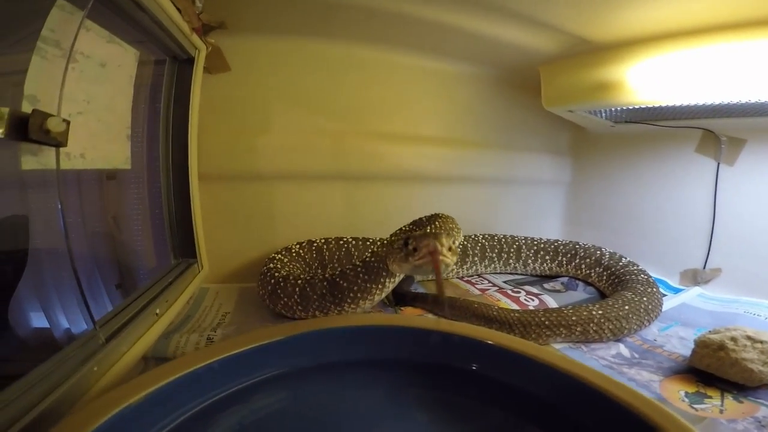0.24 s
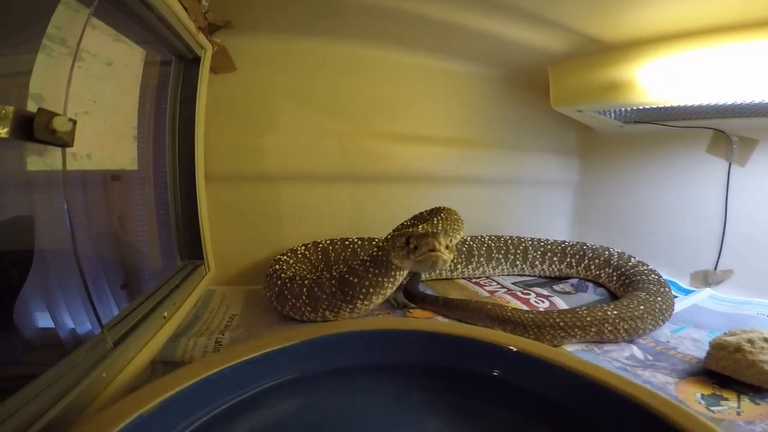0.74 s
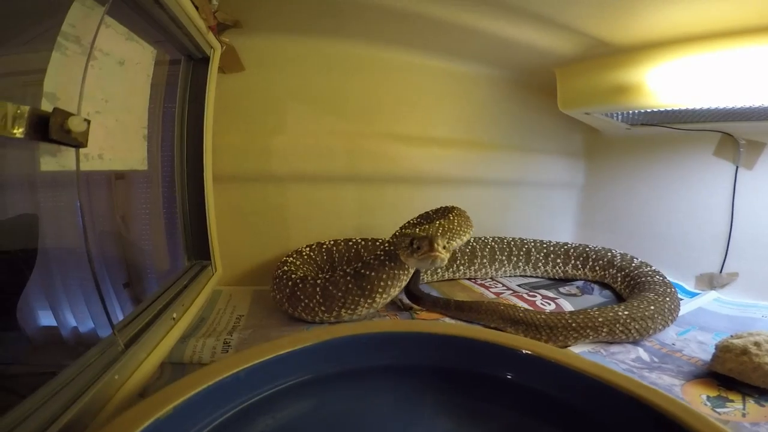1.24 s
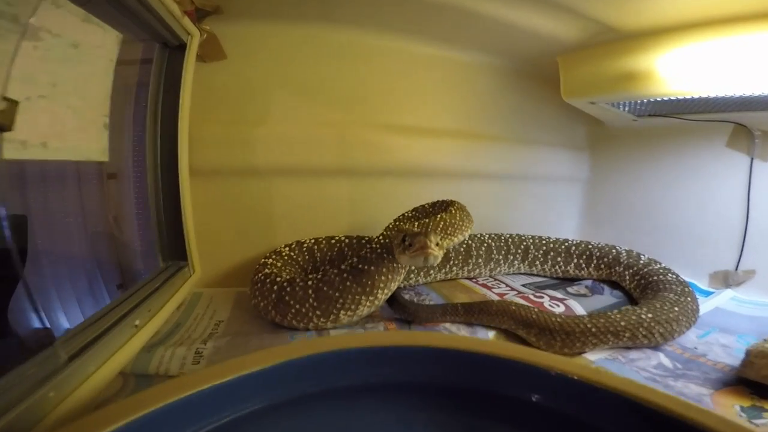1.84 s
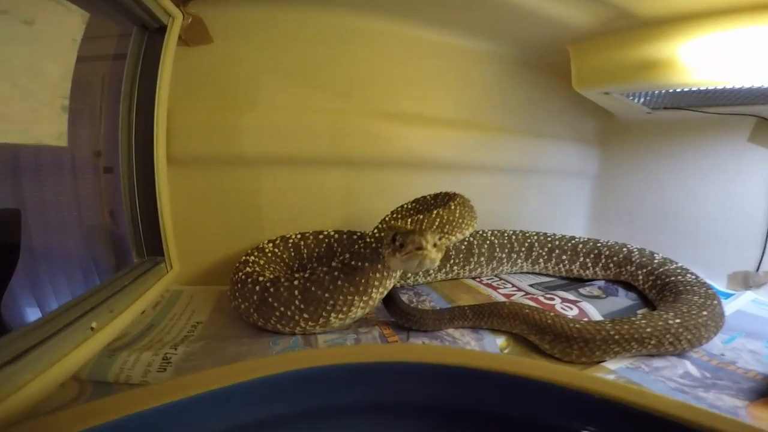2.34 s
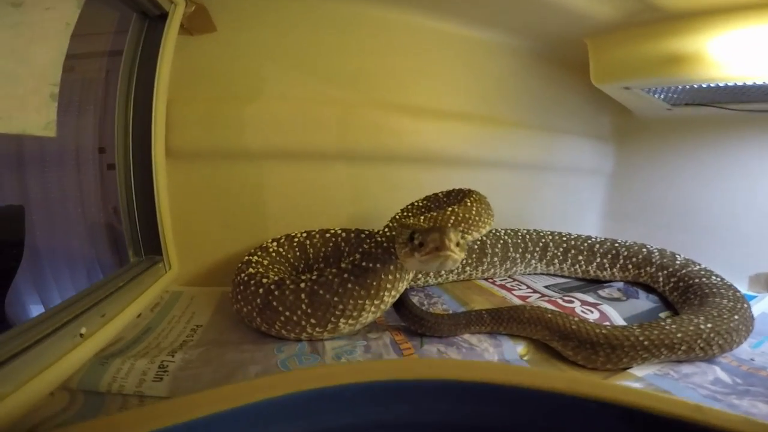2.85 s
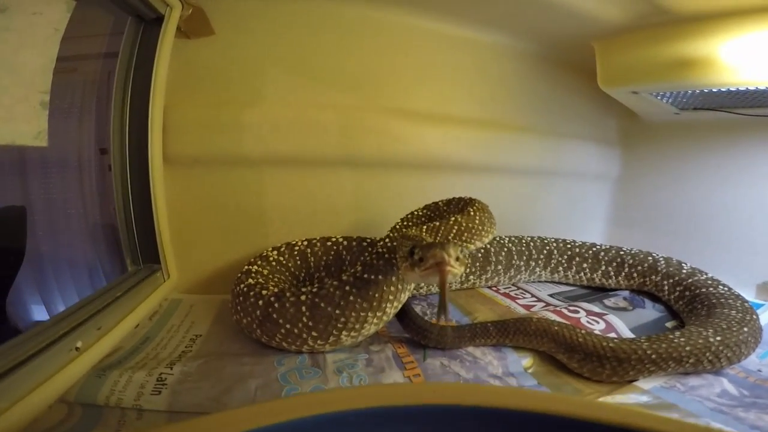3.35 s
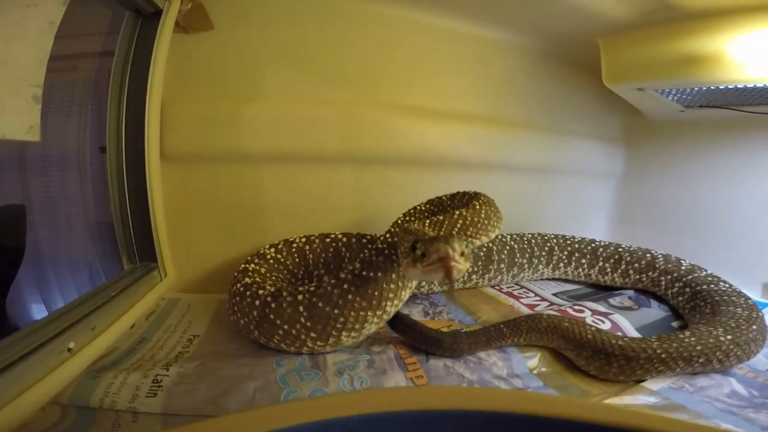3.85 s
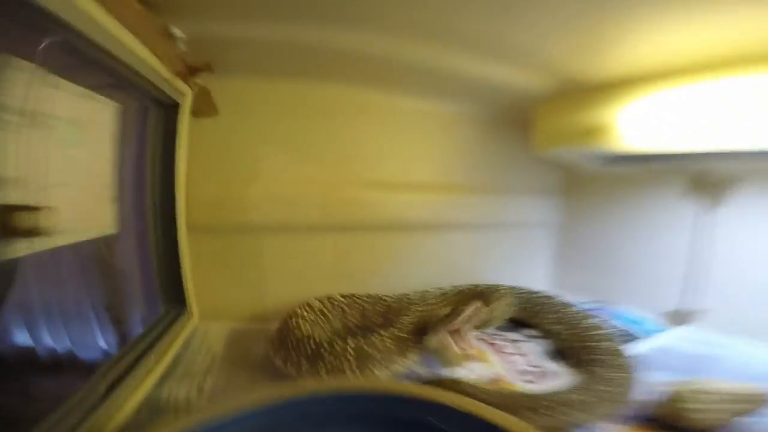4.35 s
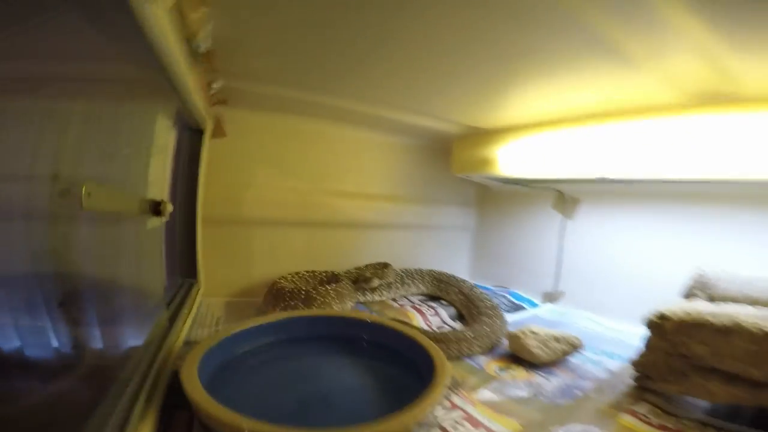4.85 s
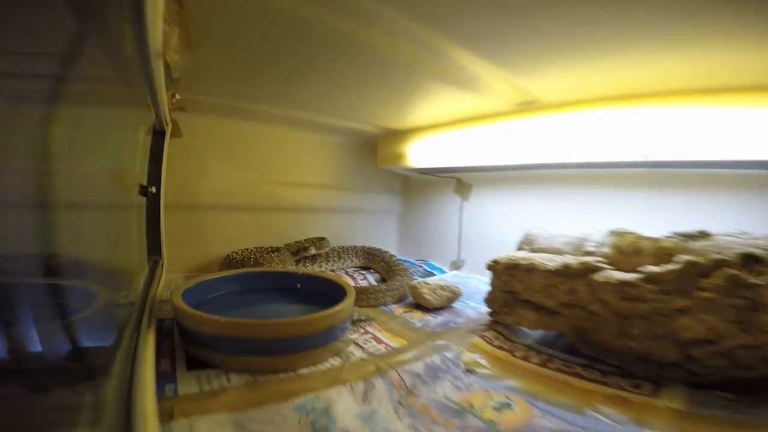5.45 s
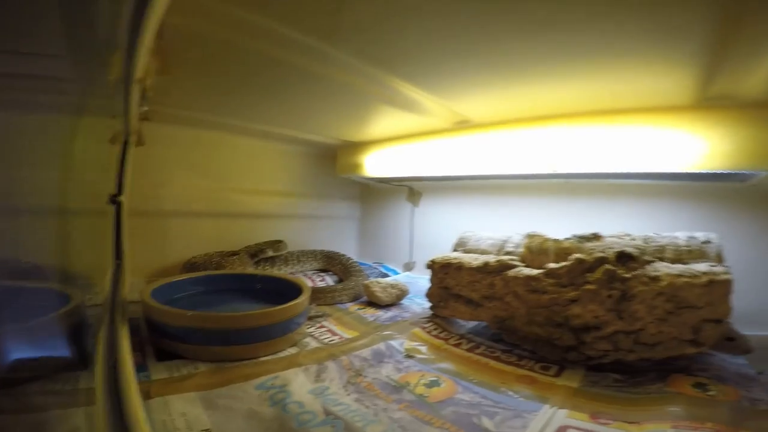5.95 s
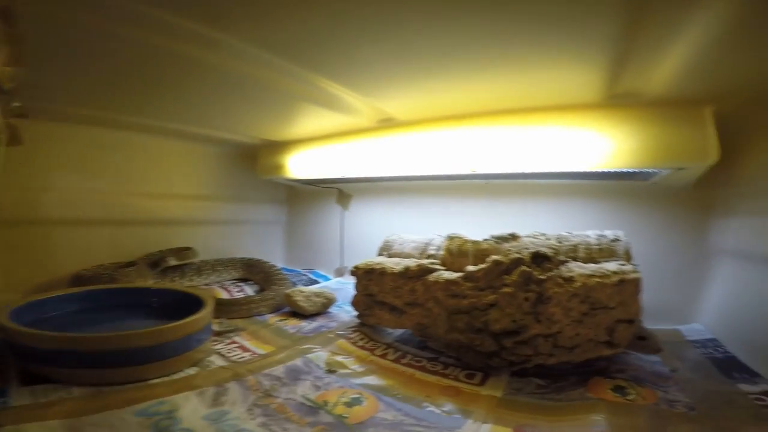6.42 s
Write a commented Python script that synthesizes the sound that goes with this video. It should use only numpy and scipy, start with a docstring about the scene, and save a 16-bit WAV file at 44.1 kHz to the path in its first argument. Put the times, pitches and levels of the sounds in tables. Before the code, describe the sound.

In a small boxy enclosure, a close camera microphone picks up low lumpy hand rumble, faint hiss and a thin, very high steady whine. A rattlesnake's dry, bright buzz of countless tiny clicks, fluttering around fifty shakes a second, grows from faint to strong by 1.1 s, drops sharply near 1.8 and stays weak until about 2.8, then swells to 4.1. Hard, short plastic knocks with quick rebounds land at 1.3, 1.8, 2.0, 2.6, 2.9, 3.2, 3.9 and 4.15; the strongest overload. At 4.2 the snake strikes: a rough, distorted crash and low thud, the buzz collapsing. Short gritty scrapes follow until 4.7, with ringing metallic clacks at 4.4 and 4.87. Near quiet follows around 5 s. From 5.4 the rattle builds again, more distant and crisp, with soft rumbling grip shifts, still rising at the end around 6.7.

```python
"""A rattlesnake buzzes its tail in a small glass-fronted enclosure: many tiny collisions, swelling and easing
with each shake, coloured by the hollow segments and echoed by the walls. Knocks on a hand-held camera make
its housing, mount and metal fitting ring, and overload the microphone. Then the snake strikes with a rough
crash, the camera is pulled back with scrapes and two ringing clacks, and the rattle grows again.
Under it all are a rumble of filtered noise from the hand, a faint hiss and a thin steady whine."""
import sys
import numpy as np
from scipy import signal
from scipy.fft import rfft, irfft, next_fast_len
from scipy.io import wavfile

SR = 44100
rng = np.random.default_rng(int(sys.argv[2]) if len(sys.argv) > 2 else 0)


def bounce(signal):
    """Save signal as a 16-bit WAV file at the path given by the first command-line argument."""
    frames = np.transpose(np.atleast_2d(signal))
    limited = np.clip(frames, -1, 1)
    pcm = np.round(limited * 32767).astype(np.int16)
    wavfile.write(sys.argv[1], SR, pcm)


N = 294588
TIME = np.arange(N) / SR   # seconds

# Tone of the hollow rattle segments. Each row: frequency in Hz, relative level in dB.
SEGMENT_TONE = [(500, -43), (1000, -29.5), (1500, -25), (2000, -19), (2900, -18), (3400, -14), (3800, -5.5),
                (6000, -6.5), (7600, -4.5), (9000, -12), (11800, -18), (13300, -12.5), (15300, -14.5)]
# Resonances and dips of the segments. Each row: frequency in Hz, width in Hz, height in dB.
SEGMENT_PEAKS = [(3150, 200, 6), (3420, 93, -6), (3706, 680, 6.5), (4018, 180, 4.5), (5290, 300, 9),
                 (5684, 160, 8.5), (6590, 150, 5.5), (7340, 400, 3), (10600, 750, 5.5)]
# The rattle before the strike. Each row: time in seconds, level in dB before the bout's gain.
WARNING = [(0.0, -48.5), (0.13, -46), (0.29, -40.5), (0.47, -37.5), (0.72, -35.5), (1.12, -32.5),
           (1.26, -33.5), (1.63, -36), (1.77, -46), (2.57, -50.5), (2.75, -47.5), (3.37, -36.5),
           (3.85, -34), (4.0, -33.5), (4.11, -34), (4.19, -43.5)]
# The rattle after the strike. Each row: time in seconds, level in dB before the bout's gain.
RENEWED = [(5.08, -66.5), (5.436, -59.5), (6.012, -43), (6.66, -39)]

# Level of the background, which sinks after the strike and slowly returns.
# Each row: time in seconds, level of the hiss in dB.
BACKGROUND = [(0, -69.5), (1.7, -61.5), (1.9, -65.5), (2.3, -64.5), (4.2, -61), (4.5, -71), (5.15, -78.5),
              (6.25, -62), (6.68, -64.5)]
# Tone of the hand's rumble. Each row: frequency in Hz, relative level in dB.
RUMBLE_TONE = [(10, -7.5), (32, 1.5), (50, 0), (75, -9), (105, -14.5), (150, -32), (230, -46), (400, -52),
               (1000, -77.5)]
# Tone of the hiss. Each row: frequency in Hz, relative level in dB.
HISS_TONE = [(100, 6), (400, 6.5), (900, -0.5), (2000, -1), (5000, -10), (15000, -13.5)]
# The hand shifts its grip and the rumble swells. Each row: time in seconds, peak level added in dB.
NUDGES = [(.25, -35), (.53, -32), (3.73, -37), (4.55, -52), (4.719, -53.5), (5.28, -55), (5.48, -44.5),
          (5.71, -37), (5.97, -39.5), (6.21, -30.5), (6.411, -41.5), (6.661, -34.5)]

# Knocks on the camera. Each row: time in seconds, force in dB, low edge in Hz, high edge in Hz,
# chatter in dB, thump in dB, metal ring in dB (these three relative to the force), number of rebounds
# (rounded; -1 leaves the knock out), time between rebounds in seconds, loss per rebound in dB.
KNOCKS = [ (1.2703, -1.5, 545, 2220, -13.5, -5.5, -6.5, 1, 0.036, 23),
          (1.758, 5, 570, 3300, -4.5, -1, -6.5, 2, .0203, 3),
          (1.9762, -11, 595, 2690, 5, -3, -17, 2, .017, 1.6),
          (2.6197, 8, 380, 4600, -8.5, -2.5, -18, 2, 0.02, 14),
          (2.8793, 6, 380, 4000, -8, -2, -23, 2, 0.021, 17),
          (3.1934, -7, 220, 1860, -1.5, -1.5, -4, 3, .015, 4.5),
          (3.8570, -4, 130, 1730, -8, 3.5, -3, 1, .04, 11.5),
          (4.1500, -4, 225, 1860, -2.5, -3, -3.5, 2, 0.014, 4),
          (4.2120, 7, 258, 4000, -9, -3.5, -21, 0, .0245, 18),
          (4.26, -15, 300, 2500, -3.5, 6, -11, 0.5, 0, 0),
          (4.3904, -9.5, 465, 5540, -6, 1.5, 11, 1, 0.0062, 3),
          (4.6920, -38, 900, 6500, -3, -8.5, 5, -1, 0, 3),
          (4.8659, -4.5, 330, 5730, -2, 0.5, 5, 1, 0.027, 8.5)]
# Ringing of the plastic housing. Each row: frequency in Hz, level in dB, time to fade by 60 dB in seconds.
HOUSING = [(330, -26, 0.091), (377, -21.5, .05), (424, -18, .04), (622, -29, .08), (794.4, -18.5, .045),
           (880, -22, 0.033), (1076, -9, 0.016), (1184, -18, 0.025), (1386, -16, 0.012), (1550, -25, .014),
           (1712, -14.5, 0.028), (2060, -22, 0.018), (2390, -26, .015), (3080, -23, 0.026),
           (4370, -22, 0.0098)]
# Swinging of the springy mount. Each row: frequency in Hz, level in dB, time to fade by 60 dB in seconds.
MOUNT = [(33.4, -20, .22), (64, -16, 0.11), (87, -25, .08), (112, -24.5, 0.22), (130.5, -9.5, 0.15)]
# Ringing of the metal fitting. Each row: frequency in Hz, level in dB, time to fade by 60 dB in seconds.
FITTING = [(1770, -10, 0.02), (1845, -23.5, 0.08), (2070, -10.5, .016), (2278, -25, .012),
           (2730, -38.5, 0.16), (3240, -25, 0.01), (4370, -16.5, 0.0066), (5450, -26.5, 0.014)]

# The crash of the strike. The one row: length in seconds, level in dB.
STRIKE = (.0255, -6)
# Tone of the crash. Each row: frequency in Hz, relative level in dB.
CRASH_TONE = [(150, 9.5), (900, 0), (2500, -3), (4000, -12), (5800, -4.5), (9000, -13.5), (15000, -21.5)]
# The mount swinging under the strike. Each row: frequency in Hz, level in dB, time to fade by 60 dB in seconds.
SHOVE = [(92, 10.5, 0.056), (34.6, -2, 0.11)]

# Scrapes around the pulling back. Each row: start in seconds, length in seconds, level in dB.
SCRAPES = [(4.244, 0.028, -29.5), (4.265, 0.062, -47.5), (4.344, 0.038, -47), (4.393, 0.031, -29),
           (4.421, 0.0334, -56), (4.46, 0.042, -43), (4.513, 0.094, -53), (4.638, 0.067, -50.5),
           (4.688, 0.0065, -36)]
# Tone of the scrapes. Each row: frequency in Hz, relative level in dB.
SCRAPE_TONE = [(300, -24), (700, -9.5), (1200, -0.5), (2300, -3), (3300, -7.5), (4400, 4.5), (5000, -10.5),
               (5600, -9.5), (6800, -27.5), (15000, -34)]
# Resonances and dips of the sliding parts. Each row: frequency in Hz, width in Hz, height in dB.
SCRAPE_PEAKS = [(1820, 49, 6), (2120, 90, 9.5), (2340, 95, 14.5), (2720, 50, 6), (4200, 120, -0.5)]

SHAKES_PER_S, SHAKE_WANDER = 54, 0.046   # average rate, and its slow wandering as a share of it
# gain and extra treble of each bout; the second is heard from further back, at another angle
WARNING_GAIN_DB, WARNING_TOP_DB = 2.2, -1.54
RENEWED_GAIN_DB, RENEWED_TOP_DB = 0.4, 1
STRIKE_S = 4.2115
STOP_DB_PER_S = 201.5   # the buzz collapses to a faint tremor as the snake lunges
# gentle shaking favours the low part: dB lost there per dB of level, and the level where nothing is lost
LOW_SAG, LOW_EVEN_DB = 0.15, -39
BOX_T60_S, BOX_DB = .06, -7.5   # wall echoes: time to fade by 60 dB, level
WHINE_HZ, WHINE_DB = 12618, -3   # electronics, level relative to the hiss
RUMBLE_DB = 26.5   # steady rumble relative to the hiss
NUDGE_S = 0.05   # time from the peak of a swell until about a third is left
CHATTER_S = 0.014   # time until the chatter is down to about a third
CHATTER_FADE, THUMP_FADE = .55, 0.93   # their shares of the loss per rebound
SOFT_CONTACT_HZ = 1750   # high edge that ever weaker rebounds approach
CUTOFF_HZ = 15200   # nothing much is left above this


def from_db(db):
    """Turn decibels into a multiplier."""
    return 10 ** (np.asarray(db) / 20)


def rms_one(x):
    """Scale a sound to an average strength (rms) of 1."""
    return x / np.sqrt(np.mean(x ** 2) + 1e-20)


def level_over_time(rows):
    """Join (time, level) points with straight lines, one value per sample."""
    seconds, level_db = np.transpose(rows)
    return np.interp(TIME, seconds, level_db)


def drift(rate):
    """Random wandering through this many new values per second, with rms 1."""
    knots = rng.standard_normal(4000)
    return rms_one(np.interp(TIME * rate, np.arange(len(knots)), knots))


def colour(x, spectrum, peaks=()):
    """Filter x to a smooth tone with resonances on top, then scale it to rms 1."""
    size = next_fast_len(N + SR // 10, real=True)
    hz = np.arange(size // 2 + 1) * SR / size + 1e-3
    points, levels = np.transpose(spectrum)
    db = np.interp(np.log(hz), np.log(points), levels)
    for centre, width, height in peaks:
        db = db + height / (1 + (2 * (hz - centre) / width) ** 2)
    filtered = irfft(rfft(x, size) * from_db(db), size)
    return rms_one(filtered[:N])


def butter(x, hz, kind, order):
    """Keep what lies below ("low") or above ("high") a frequency."""
    sos = signal.butter(order, min(hz, SR * .45), kind, fs=SR, output="sos")
    return signal.sosfilt(sos, x + 1e-18)


def ring(force, modes):
    """Each mode is a resonator that a push sets ringing at its own pitch and that then fades."""
    out = np.zeros(N)
    for hz, db, t60 in modes:
        keep = from_db(-60 / (t60 * SR))   # what is left after one sample
        turn = 2 * np.pi * hz / SR
        resonator = [1, -2 * keep * np.cos(turn), keep * keep]
        out += from_db(db) * signal.lfilter([0, np.sin(turn)], resonator, force + 1e-18)
    return out


def grains(per_s, spread_db):
    """Tiny contacts of uneven size and random sign at random moments."""
    hits = rng.random(N) < per_s / SR
    signs = rng.choice([-1, 1], N)
    sizes_db = spread_db * np.clip(rng.standard_normal(N), -2, 2)
    return hits * signs * from_db(sizes_db)


def burst(start, length, edge):
    """Open over the edge time at start, and close over it after the length."""
    opening = np.clip((TIME - start) / edge, 0, 1)
    closing = np.clip((start + length - TIME) / edge + 1, 0, 1)
    return opening * closing


def enclosure(x, near_lag_s=0.001393, sway_s=.0002, near_db=-12):
    """The nearest wall gives one echo that shifts as the tail sways; the others add a short, dense train."""
    near_echo = np.interp(TIME - near_lag_s - sway_s * drift(1.3), TIME, x)
    x = x + from_db(near_db) * near_echo
    t = TIME[:SR // 5]
    echoes = rng.standard_normal(len(t)) * from_db(-60 * t / BOX_T60_S) * (t > .001)
    echoes = echoes / np.linalg.norm(echoes)
    return x + from_db(BOX_DB) * signal.fftconvolve(x, echoes)[:N]


def rattle_bout(curve, gain_db, top_db, low, middle, top):
    """Set one bout's loudness; harder shaking makes it brighter by holding back the low part."""
    level_db = level_over_time(curve)
    low_db = np.minimum(LOW_SAG * (LOW_EVEN_DB - level_db), 1.5)
    mix = from_db(low_db) * low + middle + from_db(top_db) * top
    return from_db(level_db + gain_db) * mix


def rattle(swing_db=2.0, turn_db=-1.65, flutter_db=0.32, waver_db=1.25, knee_hz=4600, split_hz=8700):
    """Loose segments collide all the time, in two swells of force within each shake of the tail."""
    shakes = SHAKES_PER_S * (1 + SHAKE_WANDER * drift(1.2) + 0.042 * drift(25))
    phase = 2 * np.pi * np.cumsum(shakes) / SR
    shake_db = swing_db * np.cos(phase) + turn_db * np.cos(2 * phase)
    uneven_db = flutter_db * drift(30) + waver_db * drift(12)
    collisions = grains(per_s=4800, spread_db=2) * from_db(shake_db + uneven_db)
    buzz = colour(enclosure(collisions), SEGMENT_TONE, SEGMENT_PEAKS)
    # filtering forwards and backwards keeps the three parts in step
    low = signal.sosfiltfilt(signal.butter(3, knee_hz, fs=SR, output="sos"), buzz)
    body = signal.sosfiltfilt(signal.butter(3, split_hz, fs=SR, output="sos"), buzz)
    parts = low, body - low, buzz - body
    before = from_db(-STOP_DB_PER_S * np.maximum(TIME - STRIKE_S, 0))
    warning = rattle_bout(WARNING, WARNING_GAIN_DB, WARNING_TOP_DB, *parts)
    renewed = rattle_bout(RENEWED, RENEWED_GAIN_DB, RENEWED_TOP_DB, *parts)
    return before * warning + (1 - before) * renewed


def background(lumps_db=3.0):
    """Lumpy low noise from the hand on the camera, faint hiss noise and a thin electronic sine whine."""
    level_db = level_over_time(BACKGROUND)
    swells = sum(from_db(db) * np.exp(-((TIME - s) / NUDGE_S) ** 2) for s, db in NUDGES)
    hand = from_db(level_db + RUMBLE_DB + lumps_db * drift(16)) + swells
    rumble = hand * colour(rng.standard_normal(N), RUMBLE_TONE)
    hiss = colour(rng.standard_normal(N), HISS_TONE)
    whine = from_db(WHINE_DB) * np.sin(2 * np.pi * WHINE_HZ * TIME)
    return rumble + from_db(level_db) * (hiss + whine)


def knocks(chatter_size=.35, stiff_hz=290, grip_hz=162, edge_db=-8.5, edge_hz=3600):
    """Blows rock the mount and ring the housing, which chatters and rebounds, weaker and duller each time."""
    blows, thumps, metal = np.zeros((3, N))
    chatter = chatter_size * grains(per_s=1800, spread_db=2.5)
    settle = np.exp(-(TIME[:SR // 5] / CHATTER_S) ** 2)
    for s, force_db, low_hz, high_hz, chatter_db, thump_db, ring_db, rebounds, gap, loss_db in KNOCKS:
        for k in range(round(rebounds) + 1):
            at = round((s + k * gap) * SR)
            lost_db = k * loss_db
            span = slice(at, at + SR // 5)
            contact = from_db(chatter_db - CHATTER_FADE * lost_db) * chatter[span] * settle
            contact[0] = from_db(-lost_db)   # the first click
            # a soft contact reaches the high modes only through its hard edges
            top_hz = SOFT_CONTACT_HZ + (high_hz - SOFT_CONTACT_HZ) * from_db(-lost_db)
            soft = butter(contact, top_hz, "low", order=5)
            hard_edges = from_db(edge_db) * butter(contact, edge_hz, "low", order=5)
            # a contact on a stiff spot misses the low modes
            contact = from_db(force_db) * butter(soft + hard_edges, low_hz, "high", order=2)
            blows[span] += contact
            metal[span] += from_db(ring_db) * contact
            thumps[at] += from_db(force_db + thump_db - THUMP_FADE * lost_db)
    # the small stiff parts radiate little bass, and the grip cushions the mount
    stiff_parts = butter(ring(blows, HOUSING) + ring(metal, FITTING), stiff_hz, "high", order=4)
    mount = butter(ring(thumps, MOUNT), grip_hz, "low", order=4)
    return stiff_parts + mount


def strike(shove_lag_s=0.004):
    """The snake lunges at the camera: a rough crash of contacts, then its weight shoves the mount back."""
    length, crash_db = STRIKE
    rough = colour(grains(per_s=2700, spread_db=7.0), CRASH_TONE)
    crash = from_db(crash_db) * rough * burst(STRIKE_S, length, edge=.0007)
    push = np.zeros(N)
    push[round((STRIKE_S + shove_lag_s) * SR)] = -1
    return crash + ring(push, SHOVE)


def scrapes(grit_db=2.5, edge_s=0.0052, ring_db=-36):
    """Short slides that catch and slip unevenly and set the metal fitting ringing faintly."""
    level = sum(from_db(db) * burst(s, length, edge_s) for s, length, db in SCRAPES)
    contacts = grains(per_s=1800, spread_db=1.5) * from_db(grit_db * drift(200))
    slips = level * colour(contacts, SCRAPE_TONE, SCRAPE_PEAKS)
    return slips + from_db(ring_db) * ring(slips, FITTING)


def scene():
    """Add all sources together at one microphone."""
    return (rattle() + background() + knocks() + strike() + scrapes())[None]


def record(dry):
    """The loudest peaks overload and are rounded off, and the very top of the treble is cut."""
    clipped = dry / (1 + dry ** 6) ** (1 / 6)
    top_cut = signal.ellip(10, .1, 80, CUTOFF_HZ, fs=SR, output="sos")
    return signal.sosfilt(top_cut, clipped)


dry = scene()
out = record(dry)
bounce(out)
```